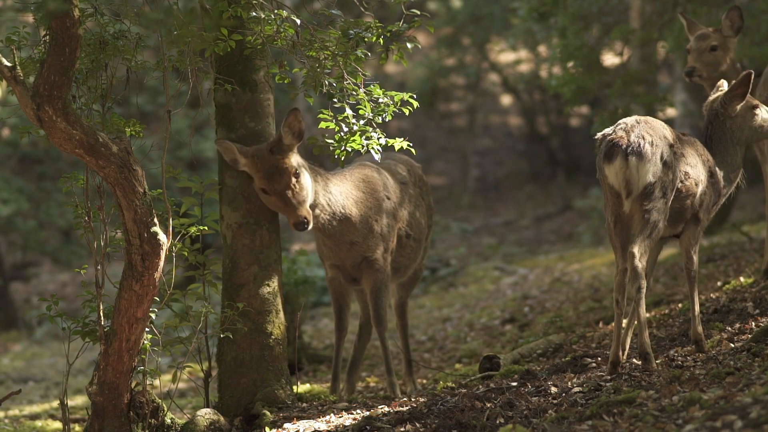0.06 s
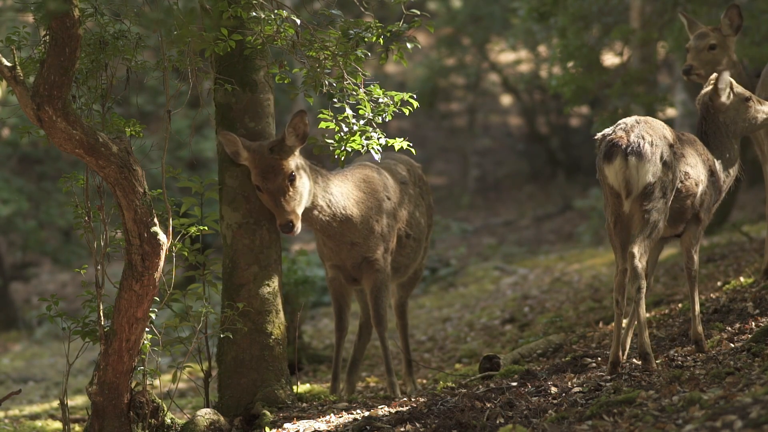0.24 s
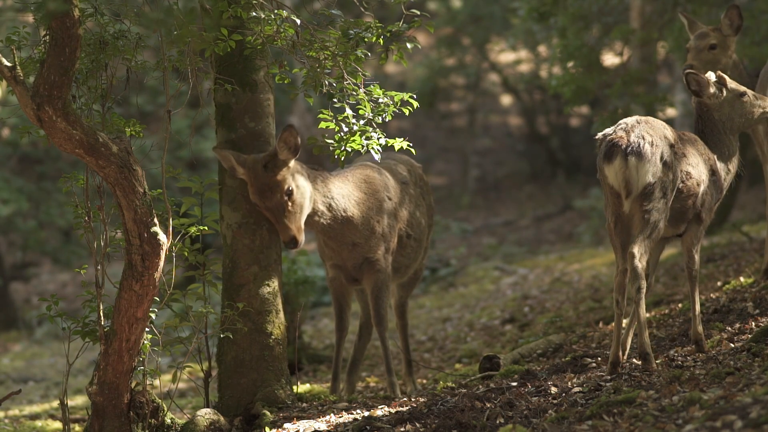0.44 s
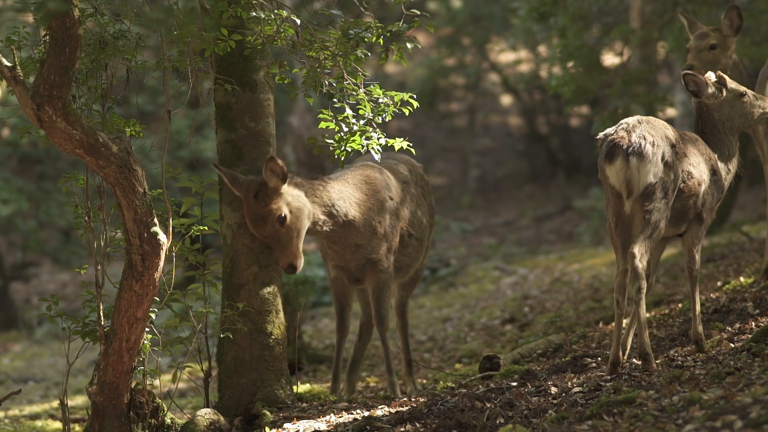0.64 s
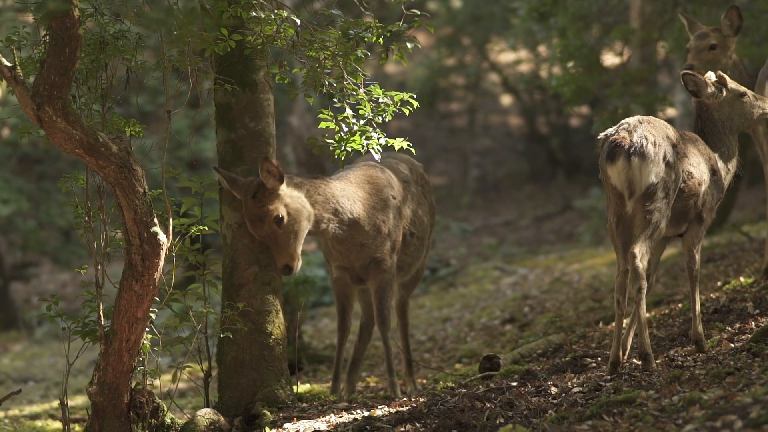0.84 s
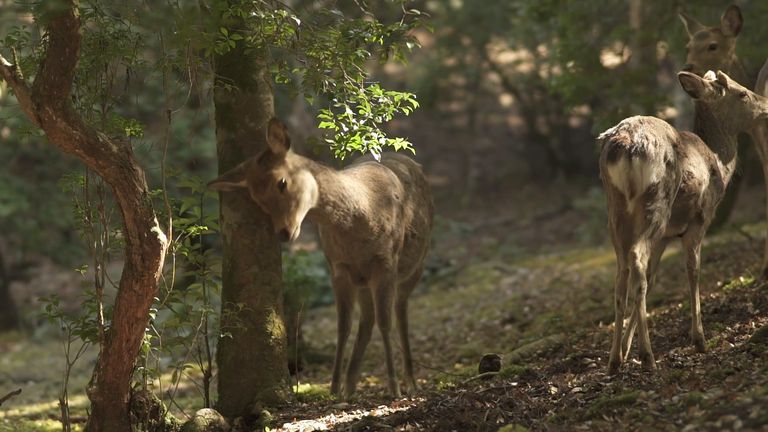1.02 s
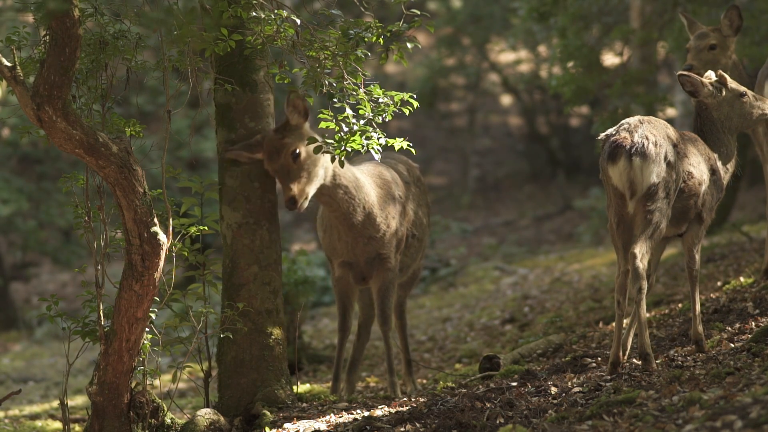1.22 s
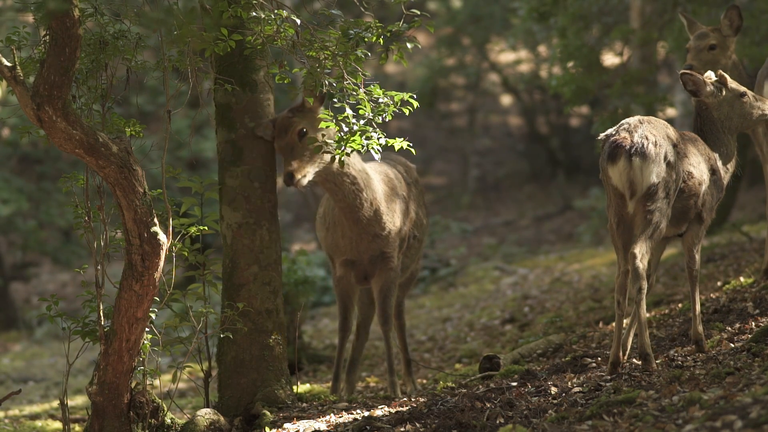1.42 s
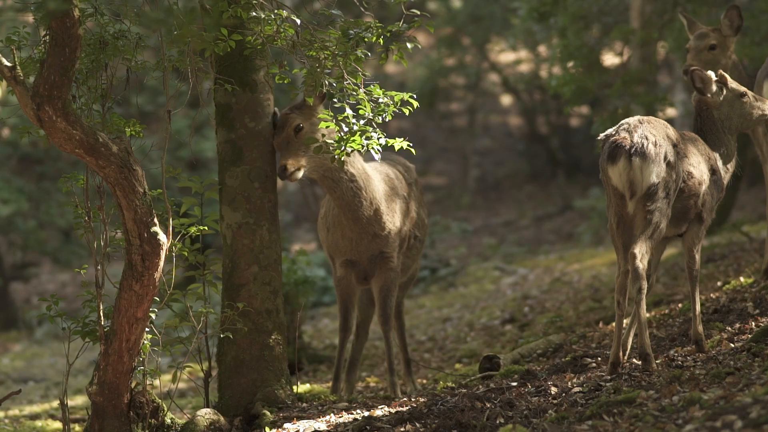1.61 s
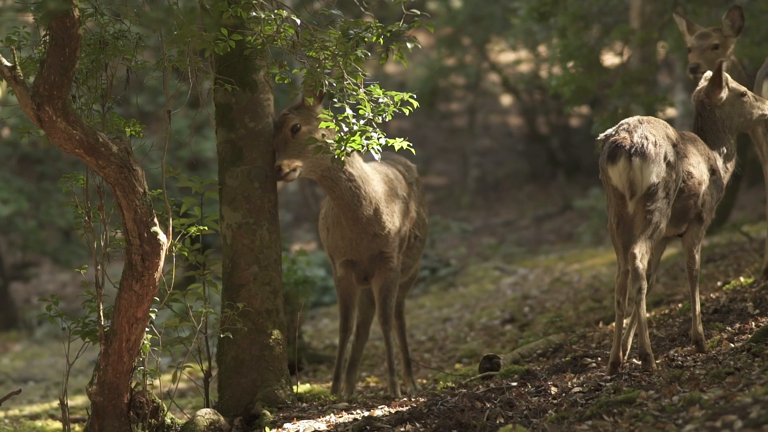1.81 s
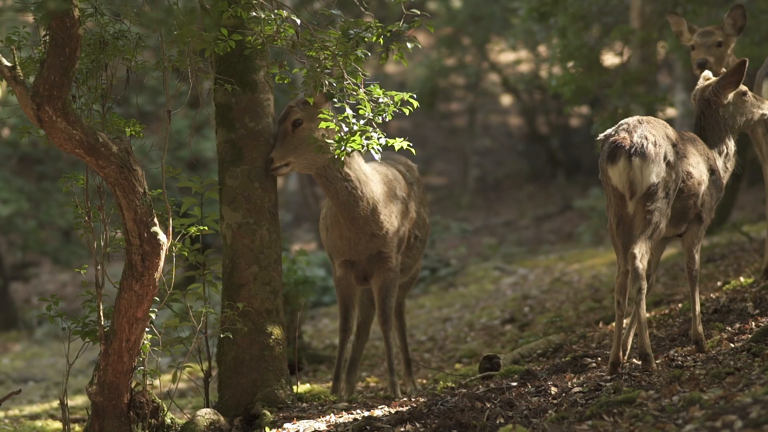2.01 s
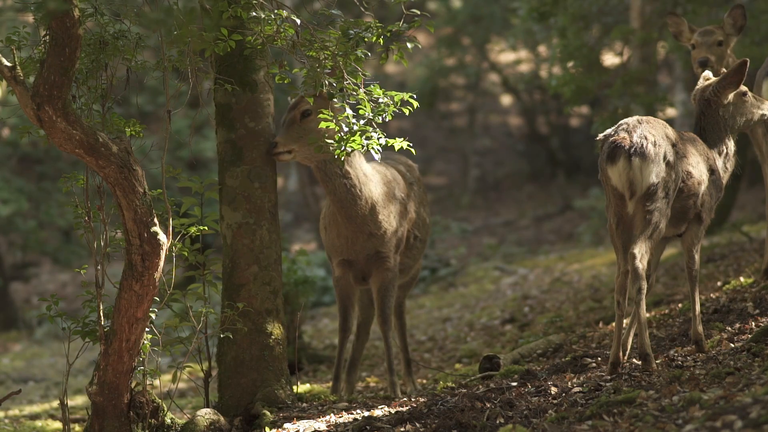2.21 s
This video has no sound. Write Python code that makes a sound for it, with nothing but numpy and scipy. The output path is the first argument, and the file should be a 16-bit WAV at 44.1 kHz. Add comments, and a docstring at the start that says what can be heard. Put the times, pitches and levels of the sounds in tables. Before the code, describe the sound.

Slightly left of the microphone, a deer's high squeal breaks up and slides down into a low creak among trees. Soft rustling, a faraway animal and faint birds come next, before the deer starts another, rising call.

```python
"""Over faint forest air and a leaf rustle, a deer squeals, a little to the left: the clean note breaks
up, falls harshly and runs down into a creak of single pulses. Its vocal folds pulse with puffs of
turbulence and ring the throat and nose; ground and trunks scatter the sound. More rustles, a faint
far call and thin bird notes follow. A second call starts low and rises at the very end."""
import sys
import numpy as np
from scipy import signal
from scipy.fft import rfft, irfft, next_fast_len
from scipy.io import wavfile
from scipy.ndimage import map_coordinates

SR = 44100
rng = np.random.default_rng(int(sys.argv[2]) if len(sys.argv) > 2 else 0)


def unload_wav(signal):
    """Save mono or channel-first audio to the path in sys.argv[1] as 16-bit WAV at rate SR, clipped to [-1, 1]."""
    wavfile.write(
        sys.argv[1],
        SR,
        np.round(np.clip(np.atleast_2d(signal).T, -1, 1) * 32767).astype(np.int16),
    )


N = 103635
TIME_S = np.arange(N) / SR
TOP_HZ = 15800

# decay among the trunks: f/Hz, T60/s
TRUNK_T60 = [(500, 0.41), (4500, 0.49), (9000, 0.11), (15000, 0.05)]


def amp(db):
    """Decibels to gain."""
    return 10 ** (np.asarray(db) / 20)


def unit(x):
    """Scale to rms 1."""
    return x / np.sqrt(np.mean(x ** 2) + 1e-20)


def along(points, hz):
    """Interpolate (f/Hz, value) points over log frequency."""
    f, value = np.transpose(points)
    return np.interp(np.log(hz + 1), np.log(f + 1), value)


def curves(rows):
    """Per-sample curve for each column after t/s."""
    times_s, *columns = np.transpose(rows)
    return [np.interp(TIME_S, times_s, column) for column in columns]


def wobble(rate_hz):
    """Smooth random curve, rate_hz knots a second."""
    return map_coordinates(rng.standard_normal(N), [TIME_S * rate_hz], mode="wrap")


def arch(start_s, length_s):
    """Half-sine rise and fall."""
    return np.sin(np.pi * np.clip((TIME_S - start_s) / length_s, 0, 1))


def filtered(x, response):
    """Apply a complex frequency response."""
    size = 2 * next_fast_len(N)
    return irfft(rfft(x, size) * response(np.fft.rfftfreq(size, 1 / SR)), size)[..., :N]


def causal(gain):
    """Minimum-phase (ringing) response with this gain."""
    cepstrum = irfft(np.log(gain + 1e-6))
    half = len(cepstrum) // 2
    return np.exp(rfft(np.concatenate([cepstrum[:1], 2 * cepstrum[1:half], np.zeros(half)])))


def pulses(at, size, half_taps=8):
    """Windowed-sinc impulses at fractional sample positions."""
    index = np.floor(at).astype(int)[:, None] + np.arange(1 - half_taps, half_taps + 1)
    offset = index - at[:, None]
    taps = size[:, None] * np.sinc(offset) * np.cos(np.pi * offset / (2 * half_taps)) ** 2
    return np.bincount(np.clip(index, 0, N).ravel(), taps.ravel(), N + 1)[:N]


def from_left(x, lag_s=0.0001725):
    """Sound from the left reaches the right microphone later and shaded."""
    # right-side shading: f/Hz, gain/dB
    shadow = [(300, 0), (700, -4), (1250, -12), (1750, -13), (2100, -7), (2700, -1.5), (3400, -3.5),
              (4400, 0), (5200, -1.5), (6000, -1), (6800, -5), (7700, -2.5), (10200, -6), (11400, -5),
              (12200, -8), (15000, -11)]
    right = filtered(x, lambda f: amp(along(shadow, f)) * np.exp(-2j * np.pi * f * lag_s))
    return np.array([x, right])


def echoes(x, t60_points):
    """Diffuse reflections, different in each channel; points are f/Hz, T60/s."""
    hz, t, noise = signal.stft(rng.standard_normal((2, SR // 2)), SR, nperseg=256)
    decay = amp(-60 * t / along(t60_points, hz)[:, None])
    tail = signal.istft(noise * decay, SR, nperseg=256)[1]
    return signal.fftconvolve(np.atleast_2d(x), tail / np.linalg.norm(tail[0]), axes=1)[:, :N]


def still_air(level_db=-65.5, rise_db_per_s=0.27):
    """Air of the wood and microphone hiss, near mono in the bass."""
    # noise spectrum: f/Hz, relative level/dB
    spectrum = [(15, -82.5), (25, -40), (53, -6.5), (86, -11.5), (119, -2.5), (156, -8), (188, -4.5),
                (368, -5), (421, -7.5), (614, -5.5), (666, -5), (1410, -4), (4040, -13), (6550, -8.5),
                (15500, -12.5)]
    # left-right likeness: f/Hz, correlation
    likeness = [(30, 0.96), (120, 0.92), (250, 1), (500, 0.55), (900, 0.52), (2000, 0), (4000, 0.37),
                (7000, 0.096), (15000, 0.1)]

    def mid_side(f):
        angle = np.arccos(np.clip(along(likeness, f), -1, 1)) / 2
        return amp(along(spectrum, f)) * [np.cos(angle), np.sin(angle)] * (f < TOP_HZ)

    mid, side = filtered(rng.standard_normal((2, N)), mid_side)
    gain = amp(level_db + rise_db_per_s * (TIME_S - N / 2 / SR))
    return gain * unit(np.array([mid + side, mid - side]))


def rustles(grain_db=4, grain_hz=640):
    """Dry leaves stir near the deer: short swells of grainy noise."""
    # leaf stirs: centre t/s, length/s, level/dB
    stirs = [(0.104, 0.037, -71), (1.534, 0.086, -70), (1.772, 0.074, -64), (1.827, 0.084, -68.5),
             (2.04, 0.083, -67.5)]
    # leaf spectrum: f/Hz, relative level/dB
    spectrum = [(1000, -34), (3000, 10), (4500, -7), (7500, 3), (11000, -2), (15000, -25)]
    grains = rng.standard_normal(N) * amp(grain_db * wobble(grain_hz))
    leaves = filtered(grains, lambda f: amp(along(spectrum, f)))
    envelope = sum(amp(db) * arch(centre_s - length_s / 2, length_s) for centre_s, length_s, db in stirs)
    return unit(from_left(leaves)) * envelope


def croak(start_s=0.164, end_s=1.45, level_db=-55, rate_hz=210):
    """Loose folds flutter in weak, uneven noise pulses, from just before the first call to just after."""
    # nearly shut mouth: f/Hz, relative gain/dB
    mouth = [(500, -29), (1200, -7), (1600, -4), (2600, -2), (3600, 5), (4600, 4.5), (5700, -15),
             (6350, 13.5), (7000, -13.5), (10000, -4.5), (15000, -12)]
    cycles = (TIME_S - start_s) * rate_hz + 0.22 * wobble(150)
    on = (TIME_S > start_s) & (TIME_S < end_s)
    flutter = on * np.exp(-3 * (cycles % 1)) * rng.standard_normal(N)
    flutter = amp(level_db) * flutter / flutter[on].std()
    return filtered(flutter, lambda f: causal(unit(amp(along(mouth, f)))))


def vocal_folds(pitch, effort):
    """One pulse a cycle; roughness scatters timing and size and adds puffs of turbulence."""
    # turbulence against the pulses: f/Hz, gain/dB
    air_colour = [(400, 4.5), (1800, 4.5), (3300, -10.5), (4700, 1), (6300, 9), (9000, 13.5), (15000, 4.5)]
    jitter_s, shimmer_db, waver, swell_db, air_gain = 0.000031, 2.5, 0.0091, 0.5, amp(-7.5)  # at rough = 1
    full_db, soft_db, dull_db, dull_hz = -29.5, -44, -7, 6150
    hz, = curves(pitch)
    db, rough = curves(effort)
    rough = np.clip(rough, 0, 1)
    on = (TIME_S >= effort[0][0]) & (TIME_S <= effort[-1][0])

    cycles = np.cumsum(on * hz * (1 + waver * rough * wobble(280))) / SR
    i = np.flatnonzero(np.diff(np.ceil(cycles)) > 0)  # last sample before each pulse
    at = i + (np.ceil(cycles[i]) - cycles[i]) / (cycles[i + 1] - cycles[i])
    jitter, shimmer = rough[i] * rng.standard_normal((N // 20, 2))[:len(i)].T
    size = np.sqrt(SR / hz[i]) * amp(shimmer_db * shimmer)
    # the voice breaks: pulses alternate strong and weak
    split = 0.5 * arch(start_s=0.492, length_s=0.18)[i]
    size *= (1 + split * np.cos(np.pi * np.arange(len(i)))) / np.sqrt(1 + split ** 2)
    voice = pulses(at + SR * jitter_s * jitter, size)

    puff = np.exp(-0.86 * (cycles % 1))
    puff /= np.sqrt(np.mean(puff[on] ** 2))
    air = on * air_gain * rough * puff * rng.standard_normal(N)
    air = filtered(air, lambda f: causal(amp(along(air_colour, f))))
    push = amp(db + swell_db * rough * wobble(76))
    flow = push * (voice + air) / np.sqrt(1 + (air_gain * rough) ** 2)

    # a soft voice loses treble
    soft = np.clip((full_db - db) / (full_db - soft_db), 0, 1)
    dulled = filtered(soft * flow, lambda f: causal(amp(dull_db / (1 + (dull_hz / (f + 1)) ** 8))))
    return (1 - soft) * flow + dulled


def deer(resonance_hz=4700, width_hz=1900):
    """The folds ring the throat, whose main resonance builds over a few cycles."""
    # fold pitch, one list per call: t/s, f/Hz
    pitches = [
        [(.208, 1813), (.224, 1694), (.27, 1716), (.305, 1722), (.335, 1690), (.362, 1638), (.385, 1601),
         (.408, 1475), (.434, 1286), (.482, 1038), (.526, 942.3), (.56, 839.2), (.585, 805.7), (.62, 767.3),
         (.66, 801), (.68, 757.4), (.715, 722.7), (.75, 687.4), (.80, 593.3), (.90, 425.7), (1.0, 290.4),
         (1.07, 237.9), (1.17, 198.1), (1.31, 190.6), (1.335, 164.7), (1.355, 128), (1.368, 76.2),
         (1.385, 59.2)],
        [(2.305, 421), (2.325, 555), (2.35, 758)],
    ]
    # vocal effort, one list per call: t/s, source level/dB, roughness/0-1
    efforts = [
        [(.208, -55, .15), (.213, -32.5, 0.12), (.223, -27.5, 0.04), (.243, -24.5, 0.02), (.32, -23, 0.05),
         (.34, -26.5, 0.08), (.38, -29.5, 0.27), (.415, -32, 0.62), (.435, -29, 0.44), (.452, -32, 0.36),
         (.485, -32.5, 0.87), (.53, -33, 0.62), (.56, -33.5, 0.87), (.59, -33.5, 0.69), (.62, -34, 0.81),
         (.655, -33.5, .55), (.675, -32.5, .6), (.69, -30.5, 0.35), (.80, -32.5, 0.34), (.90, -35.5, 0.37),
         (1.0, -40.5, 0.46), (1.08, -43.5, 0.45), (1.22, -43.5, 0.42), (1.325, -46.5, 0.46), (1.35, -47, 0.28),
         (1.378, -62, 0.12), (1.39, -70, 0.06)],
        [(2.305, -48.5, 0.37), (2.325, -42, 0.48), (2.35, -39, 0.55)],
    ]
    # throat and nose resonances: f/Hz, relative gain/dB
    throat = [(150, -51.5), (400, -37.5), (620, -29.5), (790, -36), (1000, -25), (1250, -24), (1700, -25.5),
              (2000, -13), (2400, -24), (2900, -11), (3400, -11.5), (3800, -9.5), (4080, -10.5),
              (4330, -1.5), (4750, 2), (4950, -4.5), (5200, -7.5), (5550, -14.5), (5800, -8.5),
              (6100, -15.5), (6750, -7), (7500, -12), (8400, -8.5), (9500, -15.5), (10200, -13.5),
              (11400, -24), (12100, -17.5), (14000, -20.5), (15800, -34)]

    def tract(f):
        allpass = np.exp(-2j * np.arctan2(f * width_hz, resonance_hz ** 2 - f ** 2))
        return allpass * causal(unit(amp(along(throat, f))))

    source = sum(vocal_folds(pitch, effort) for pitch, effort in zip(pitches, efforts))
    return from_left(croak() + filtered(source, tract))


def far_call(start_s=1.72, end_s=2.19, pitch_hz=317, sag=0.05, flutter_db=2.5):
    """Another animal far off to the left: one wavering note, flat at both ends, with its echo."""
    # overtones: harmonic number, level before panning/dB
    harmonics = [(2, -93), (3, -74.5), (4, -68), (5, -86)]
    envelope = np.sqrt(np.abs(arch(start_s, end_s - start_s)))
    hz = pitch_hz * (1 - sag * (1 - envelope) ** 2 + 0.0078 * wobble(90))
    phase = 2 * np.pi * np.cumsum(hz) / SR
    note = envelope * sum(amp(db + flutter_db * wobble(24.2)) * np.sin(k * phase) for k, db in harmonics)
    pan = amp([[2], [-4]])
    return (note + 0.3 * echoes(note, TRUNK_T60)) * pan


def birds():
    """Thin, high, wavering notes, blurred by the trees."""
    # notes: t/s, length/s, start f/Hz, end f/Hz, level/dB
    notes = [(2.014, 0.055, 5150, 4750, -63), (2.036, 0.12, 7860, 7850, -63), (2.194, .12, 7450, 7500, -72)]
    song = np.zeros(N)
    for start_s, length_s, start_hz, end_hz, db in notes:
        hz, = curves([(start_s, start_hz), (start_s + length_s, end_hz)])
        phase = 2 * np.pi * np.cumsum(hz * (1 + 0.043 * wobble(300))) / SR
        song += amp(db) * arch(start_s, length_s) * np.sin(phase)
    return echoes(song, [(5000, 0.07)])


def scene(trunks_db=-16.5, near_db=-13, near_t60_s=0.054):
    """The deer, its echoes and the wood around it."""
    calls = deer()
    tail = amp(trunks_db) * echoes(calls, TRUNK_T60)
    scatter = amp(near_db) * echoes(calls, [(5000, near_t60_s)])  # ground and nearest trunk
    return calls + tail + scatter + far_call() + birds() + rustles() + still_air()


def record(dry):
    """Brick-wall low-pass at TOP_HZ."""
    return filtered(dry, lambda f: f < TOP_HZ)


dry = scene()
out = record(dry)
unload_wav(out)
```